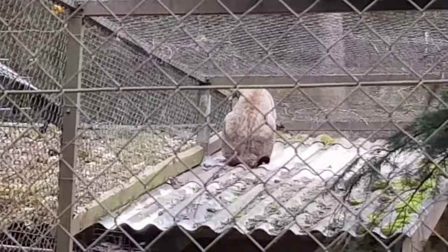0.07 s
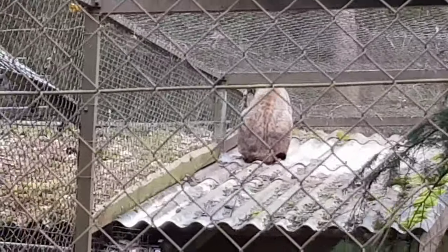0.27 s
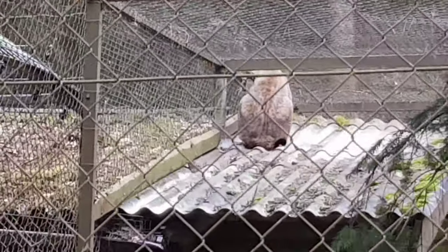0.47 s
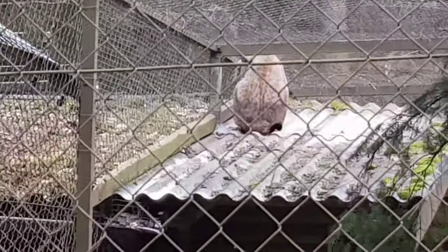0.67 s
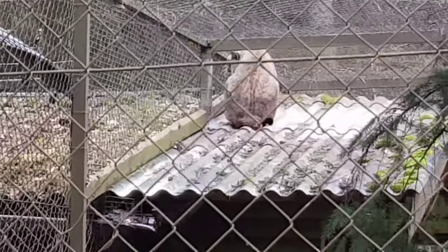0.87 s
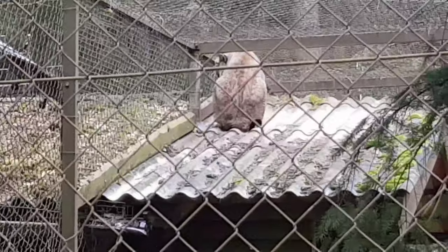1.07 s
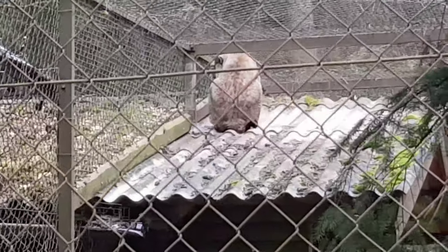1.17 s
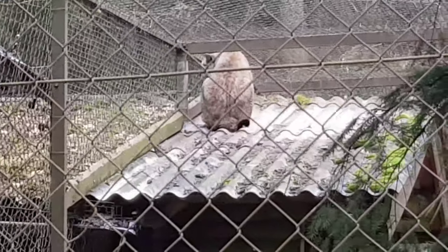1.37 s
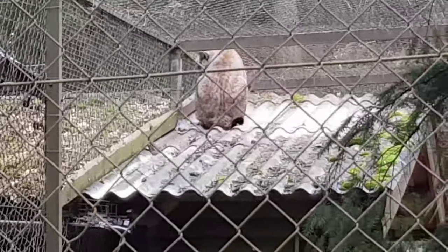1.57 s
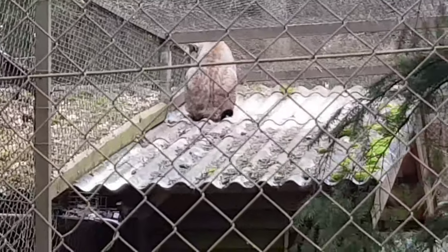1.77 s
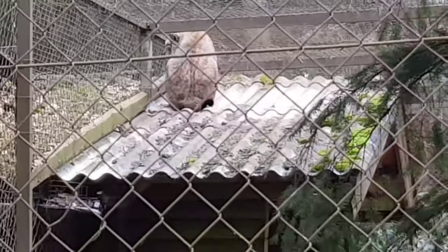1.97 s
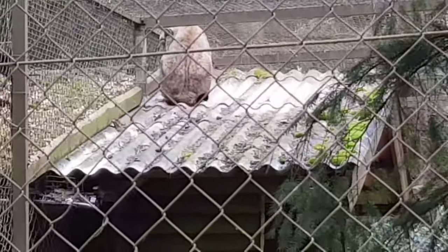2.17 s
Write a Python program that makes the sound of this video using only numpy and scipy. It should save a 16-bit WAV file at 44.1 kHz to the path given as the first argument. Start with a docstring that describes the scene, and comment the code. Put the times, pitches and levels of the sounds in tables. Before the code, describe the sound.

A big wild cat yowls once, rising fast then falling, in an outdoor pen with chirping birds

```python
"""A wild cat yowls once in an outdoor pen at a wood's edge; a second, softer voice slides down under it.
Both voices are gliding sine harmonics with throat noise. Two small birds trill chirps of arched pitch,
another whistles settling sines; decaying noise echoes them from the trees over far traffic rumble.
Soft low bumps come between; near the end decaying modes tick, and shaped noise brushes like cloth
close to the microphone."""
import sys
import numpy as np
from scipy import signal
from scipy.fft import rfft, irfft
from scipy.io import wavfile
from scipy.ndimage import uniform_filter1d

SR = 44100
rng = np.random.default_rng(int(sys.argv[2]) if len(sys.argv) > 2 else 0)


def dump_mix(stems):
    """Bounce the given channels to the path in sys.argv[1] as a 16-bit WAV at rate SR."""
    frames = np.atleast_2d(stems).T  # one column per channel
    limited = np.clip(frames, -1, 1)  # hard clip at full scale
    pcm = np.round(limited * 32767).astype(np.int16)
    wavfile.write(sys.argv[1], SR, pcm)


def convert_level_to_amplitude(level_db):
    """Map a level in decibels to its linear amplitude factor."""
    exponent = np.asarray(level_db, float) / 20
    return 10 ** exponent


N = 97020
T = np.arange(N) / SR


def table(rows, hz):
    """Value of (Hz, value) rows, interpolated on a log-frequency axis."""
    r = np.array(rows, float)
    return np.interp(np.log(np.maximum(hz, 1)), np.log(r[:, 0]), r[:, 1])


def unit(x):
    """Scale to rms 1."""
    return x / np.sqrt(np.mean(x ** 2))


def shade(x, gain):
    """Filter by a gain function of Hz."""
    return irfft(rfft(x) * gain(np.arange(N // 2 + 1) * SR / N), N)


def walk(rate_hz):
    """Smooth random curve with rms 1: noise under a Gaussian lowpass."""
    return unit(shade(rng.standard_normal(N), lambda f: np.exp(-(f / rate_hz) ** 2)))


def stereo_noise(gain, side_db=0):
    """Coloured noise: a mid signal plus an unrelated side signal."""
    # side against mid: freq_hz, level_db (side_db adds to it)
    side_width = [(60, -25.5), (110, -23.5), (200, -14.5), (380, -18.5), (700, -18), (1290, -11.5),
                  (2380, -12), (4400, -14), (8120, -9.5), (15000, -7)]
    mid = shade(rng.standard_normal(N), gain)
    side = shade(rng.standard_normal(N), lambda f: gain(f) * convert_level_to_amplitude(table(side_width, f) + side_db))
    return unit(np.array([mid + side, mid - side]))


def late_copy(x, delay_s, level_db):
    """One discrete reflection: a delayed, weaker copy."""
    lag = int(delay_s * SR)
    return convert_level_to_amplitude(level_db) * np.pad(x, (lag, 0))[:N]


def echoes(x, near_db, wood_db, near_t60_s):
    """Early scatter from the pen and a long tail from the trees, both decaying noise."""
    wood_t60_s, low_hz, high_hz = 1.137, 500, 3630
    noise = stereo_noise(lambda f: f / np.hypot(f, low_hz) / (1 + (f / high_hz) ** 2), side_db=5.5)
    response = 0
    for t60_s, level_db, start_s in ((near_t60_s, near_db, .003), (wood_t60_s, wood_db, .04)):
        onset = np.clip(T / start_s - 1, 0, 1)
        h = noise * convert_level_to_amplitude(-60 * T / t60_s) * onset
        response = response + convert_level_to_amplitude(level_db) * h / np.sqrt(np.mean(np.sum(h ** 2, axis=1)))
    return x + signal.fftconvolve(x[None], response, axes=1)[:, :N]


def air():
    """Traffic rumble and hiss as coloured noise, with the blur of far birds in three noise bands."""
    # outdoor floor: freq_hz, relative_db_per_hz
    floor_colour = [(12, -49), (20, -4.5), (70, 8), (104, 2), (197, -11.5), (386, -18), (942, -9.5),
                    (1560, -16.5), (2240, -18), (2880, -20), (4250, -18.5), (5030, -20.5), (6470, -25.5),
                    (8090, -32), (15800, -32.5)]
    # far chatter: time_s, level_db
    chatter = [(0, -57), (.5, -57), (.9, -56), (1.3, -59), (1.6, -67), (2.2, -85)]
    floor_db = -57
    floor = stereo_noise(lambda f: convert_level_to_amplitude(table(floor_colour, f))) * convert_level_to_amplitude(floor_db + walk(16))
    blur = stereo_noise(lambda f: np.exp(-((f - 4200) / 900) ** 2)
                        + 0.77 * np.exp(-((f - 6200) / 700) ** 2)
                        + 1.22 * np.exp(-((f - 2400) / 700) ** 2))
    return floor + blur * convert_level_to_amplitude(np.interp(T, *np.array(chatter).T) + walk(3))


def chirps(rows, arch):
    """Grainy harmonics arch up to a top pitch and down again in each chirp."""
    out = np.zeros(N)
    rise_s, fall_s, drop, roundness, harmonic_db, leg_fade_db = arch
    grain_db = 3
    grains = [convert_level_to_amplitude(db + grain_db * walk(220)) for db in harmonic_db]
    for top_s, top_hz, level_db in rows:
        i = np.arange(max(int((top_s - rise_s) * SR), 0), int((top_s + fall_s) * SR))
        leg = (T[i] - top_s) / np.where(T[i] < top_s, rise_s, fall_s)  # -1 start, 0 top, 1 end
        hz = top_hz * (1 - drop * np.abs(leg) ** roundness)
        phase = 2 * np.pi * np.cumsum(hz) / SR
        env = np.clip((1 - np.abs(leg)) / 0.048, 0, 1)
        tone = sum(grain[i] * convert_level_to_amplitude(-fade_db * leg ** 2) * np.sin((k + 1) * phase)
                   for k, (grain, fade_db) in enumerate(zip(grains, leg_fade_db)))
        out[i] += convert_level_to_amplitude(level_db) * env * tone
    return out


def quick_bird():
    """Second bird: chirps with nearly even rise and fall."""
    # top_s, top_hz, level_db
    quick_rows = [(.004, 2317, -56.5), (.257, 2180, -57.5), (.371, 2293, -53.5), (.483, 2229, -51.5),
                  (.535, 2100, -59), (.59, 2380, -51.5), (.65, 2100, -52.5), (.698, 2350, -52),
                  (.765, 2277, -53.5), (.812, 2315, -45.5), (.926, 2357, -52), (1.017, 2227, -60),
                  (1.04, 2260, -52), (1.152, 2205, -57), (1.273, 2265, -53.5), (1.391, 2275, -57),
                  (1.508, 2319, -57), (1.585, 2206, -68), (1.625, 2307, -56.5), (1.74, 2220, -56)]
    # rise_s, fall_s, pitch_drop_share, roundness, harmonic_1_to_3_db, leg_fade_1_to_3_db
    quick_arch = (.013, .012, .45, 2.3, (3, -1, -9), (12, -4, 5))
    return chirps(quick_rows, quick_arch)


def slow_bird():
    """First bird: chirps with a longer fall, reflected once by a shed wall behind it."""
    # top_s, top_hz, level_db
    slow_rows = [(.042, 2164, -50), (.167, 2240, -54), (.295, 2177, -52), (.418, 2137, -50),
                 (.563, 2100, -49.5), (.683, 2174, -48.5), (.798, 2183, -49.5), (.923, 2182, -49.5),
                 (1.048, 2190, -51), (1.191, 2051, -53.5), (1.312, 2097, -50.5)]
    # rise_s, fall_s, pitch_drop_share, roundness, harmonic_1_to_3_db, leg_fade_1_to_3_db
    slow_arch = (.01, .024, .33, 1.45, (-12.5, -2, -2), (8, -5, 12))
    song = chirps(slow_rows, slow_arch)
    return song + late_copy(song, delay_s=.015, level_db=-11)


def voice(rows):
    """Gliding harmonics, with a little throat noise swelling once a cycle."""
    # throat noise colour: freq_hz, relative_db
    throat_colour = [(250, -6.5), (500, 1.5), (1000, -3), (1700, -32.5), (2500, 14.5), (2900, -4.5),
                     (4000, -25)]
    pitch_wobble, flutter_db, shimmer_db, rasp_db = .002, 1.2, 1.2, -23
    r = np.array(rows, float)
    times_s = r[:, 0]
    hz, *harmonic_db = (uniform_filter1d(np.interp(T, times_s, column), size=1400)
                        for column in r[:, 1:].T)
    phase = 2 * np.pi * np.cumsum(hz * (1 + pitch_wobble * walk(19.2))) / SR
    strain_db = shimmer_db * np.interp(T, (.3, .6), (0, 1))  # the voice roughens as it tires
    tone = 0
    for k, db in enumerate(harmonic_db):
        level = np.sqrt(2) * convert_level_to_amplitude(db + flutter_db * walk(25) + strain_db * walk(190))
        tone = tone + level * np.sin((k + 1) * phase + k)
    breath = rng.standard_normal(N) * (1 + 0.18 * np.cos(phase))
    rasp = unit(shade(breath, lambda f: convert_level_to_amplitude(table(throat_colour, f))))
    effort = np.sqrt(sum(convert_level_to_amplitude(db) ** 2 for db in harmonic_db))
    gate = np.clip(np.minimum(T - times_s[0], times_s[-1] - T) / 0.0049, 0, 1)
    return (tone + convert_level_to_amplitude(rasp_db) * effort * rasp) * gate


def main_yowl():
    """Loud voice: pitch climbs quickly, then falls, on four harmonics."""
    # time_s, pitch_hz, harmonic_1_to_4_db
    yowl_rows = [(0.17, 274.5, -70, -70, -92, -73), (0.226, 378.4, -62.5, -43, -52, -53.5),
                 (0.25, 462, -47, -41.5, -57, -72), (0.27, 505.6, -41.5, -46, -49.5, -63.5),
                 (0.316, 585, -45.5, -38, -43.5, -53), (0.34, 625.7, -41, -37.5, -58.5, -66.5),
                 (0.39, 647.3, -46.5, -36, -41.5, -52), (0.46, 643.6, -45, -36.5, -45, -51.5),
                 (0.505, 613, -44, -32.5, -41.5, -46), (0.584, 570.2, -44.5, -32, -36, -46),
                 (0.652, 540.2, -40, -34, -41, -39.5), (0.746, 475.8, -44.5, -34.5, -41, -48),
                 (0.758, 470, -39, -35, -41.5, -39), (0.848, 445.6, -51.5, -38.5, -46, -42.5),
                 (0.908, 426, -42.5, -45, -41.5, -45.5), (0.962, 400.4, -55, -44.5, -43, -41.5),
                 (1.0, 376.4, -60, -54.5, -42, -41), (1.028, 344.1, -58, -45, -44, -59)]
    return voice(yowl_rows)


def whistles():
    """Sines gliding exponentially towards a target pitch, slightly throbbing."""
    # start_s, length_s, first_hz, target_hz, settling_s, level_db
    whistle_rows = [(0.451, 0.07, 5830, 5340, 0.045, -61.5), (0.507, 0.058, 3700, 3370, 0.16, -62),
                    (1.488, 0.062, 4150, 4084, 0.019, -59.5), (1.579, 0.074, 5020, 4400, 0.0049, -59.5),
                    (1.85, 0.11, 3717, 4208, 0.096, -53), (1.88, 0.17, 4806, 6260, 0.15, -76.5),
                    (1.92, 0.046, 3144, 3065, 0.022, -64), (1.982, 0.02, 3080, 3120, 0.035, -71),
                    (1.988, 0.082, 5210, 4280, 0.0045, -51.5), (2.085, .115, 4193, 4275, 0.031, -61.5),
                    (2.085, 0.048, 2807, 2730, 0.022, -59.5)]
    throb_db, swell_db, attack_s, release_s = 2.5, 4, .003, .017
    out = np.zeros(N)
    throb = convert_level_to_amplitude(throb_db * walk(82))
    for start_s, length_s, first_hz, target_hz, settling_s, level_db in whistle_rows:
        t = np.arange(int(length_s * SR)) / SR
        env = np.clip(np.minimum(t / attack_s, (length_s - t) / release_s), 0, 1)
        swell = convert_level_to_amplitude(swell_db * np.sin(np.pi * t / length_s))
        hz = target_hz + (first_hz - target_hz) * np.exp(-t / settling_s)
        i = int(start_s * SR)
        out[i:i + len(t)] += convert_level_to_amplitude(level_db) * env * swell * np.sin(2 * np.pi * np.cumsum(hz) / SR)
    return out * throb


def second_voice():
    """Softer voice: after a short rise, pitch slides down on three harmonics."""
    # time_s, pitch_hz, harmonic_1_to_3_db
    under_rows = [(.6, 410, -62, -70, -70), (.622, 455, -47, -56, -64), (.66, 482, -45, -56, -62),
                  (.74, 458, -44, -41, -58), (.8, 408, -45, -42, -54), (.87, 345, -47, -48, -54),
                  (.92, 322, -48, -54, -60), (.955, 305, -60, -68, -68)]
    return voice(under_rows)


def soft_bumps():
    """Low sines under Gaussian envelopes a few milliseconds wide."""
    # centre_s, freq_hz, level_db
    bump_rows = [(1.111, 170, -46), (1.255, 292, -49), (2.046, 290, -45.5)]
    return sum(convert_level_to_amplitude(level_db) * np.exp(-((T - centre_s) / 0.0021) ** 2)
               * np.sin(2 * np.pi * hz * (T - centre_s)) for centre_s, hz, level_db in bump_rows)


def dry_tick():
    """One strike on fast-decaying modes, panned left."""
    # freq_hz, relative_db, t60_s
    mode_rows = [(2100, -19, 0.0066), (4140, -12, 0.0018), (7000, 8.5, 0.0014), (10700, -4, 0.0012)]
    start_s, level_db = 1.7711, -38
    t = np.maximum(T - start_s, 0)
    tick = sum(convert_level_to_amplitude(db - 60 * t / t60_s) * np.sin(2 * np.pi * hz * t) for hz, db, t60_s in mode_rows)
    return convert_level_to_amplitude(level_db) * tick * convert_level_to_amplitude(np.array([[2.5], [-2.5]]))


def cloth_brush():
    """Coloured noise with moving level and treble, flickering, slightly right."""
    # time_s, level_db, boost_above_8_khz_db
    brush_rows = [(1.78, -84, 21.5), (1.81, -75.5, 17), (1.87, -84.5, 25.5), (1.97, -77, 13.5),
                  (2.021, -61, 7.5), (2.042, -49.5, 2), (2.072, -52.5, -25), (2.11, -50, -5.5),
                  (2.162, -51, 0), (2.2, -55, 3)]
    # freq_hz, relative_db_per_hz
    cloth_colour = [(800, -14.5), (2000, -6.5), (2250, 0), (2500, 0.5), (2800, 0), (3200, -4), (5500, -6.5),
                    (7500, -10), (10000, -14.5), (13500, -9.5), (15500, -17.5)]
    time_s, level_db, boost_db = np.array(brush_rows, float).T
    cloth = stereo_noise(lambda f: convert_level_to_amplitude(table(cloth_colour, f)), side_db=-2)
    high = signal.sosfilt(signal.butter(4, 8000, "high", fs=SR, output="sos"), cloth)
    cloth = cloth + (convert_level_to_amplitude(np.interp(T, time_s, boost_db)) - 1) * high
    flicker_db = 1.25 * walk(58)
    cloth = cloth * convert_level_to_amplitude(np.interp(T, time_s, level_db, left=-120) + flicker_db)
    return cloth * convert_level_to_amplitude(np.array([[-.5], [.5]]))


def scene():
    """Cats and birds in the echo of the wood, over the floor, with tick, bumps and cloth."""
    birds = echoes(slow_bird() + quick_bird(), near_db=-7, wood_db=-10, near_t60_s=.06)
    birds = birds * convert_level_to_amplitude(np.array([[-.5], [.5]]))
    cats_dry = main_yowl() + second_voice()
    thin = shade(cats_dry, lambda f: 1 / (1 + (850 / (f + 1)) ** 6))  # lows cut below 850 Hz
    cats = echoes(cats_dry, near_db=-18.5, wood_db=-20, near_t60_s=.12)
    cats = cats + late_copy(thin, delay_s=.25, level_db=-21)  # from far trees
    notes = echoes(whistles(), near_db=-14, wood_db=-9.5, near_t60_s=.12)
    return air() + birds + cats + notes + soft_bumps() + dry_tick() + cloth_brush()


def roll_off(x):
    """The treble ends steeply here."""
    return signal.sosfilt(signal.butter(12, 16460, fs=SR, output="sos"), x)


def record(dry):
    """Deliver the finished mix."""
    return roll_off(dry)


dry = scene()
out = record(dry)
dump_mix(out)
```